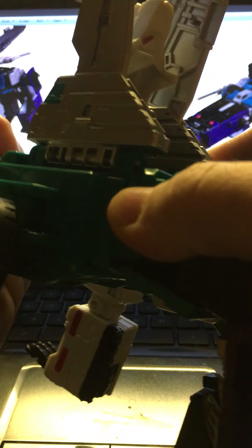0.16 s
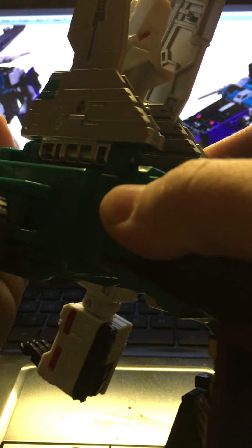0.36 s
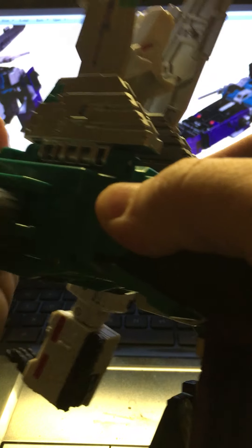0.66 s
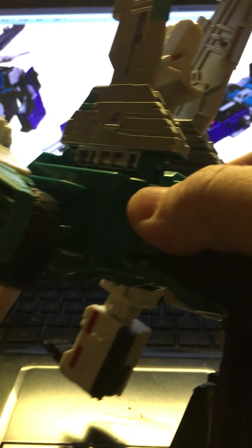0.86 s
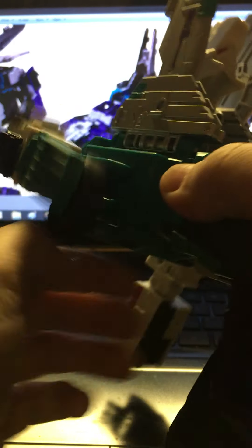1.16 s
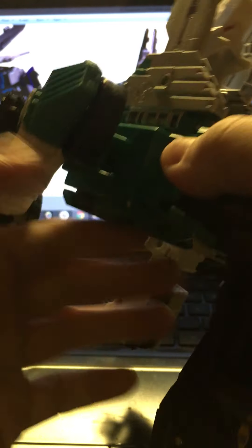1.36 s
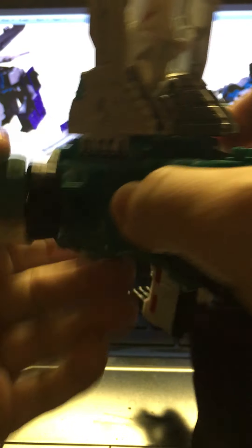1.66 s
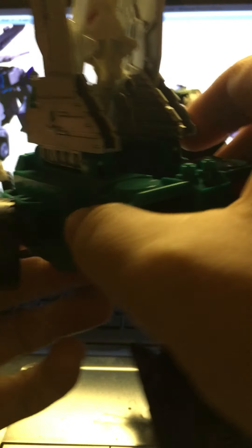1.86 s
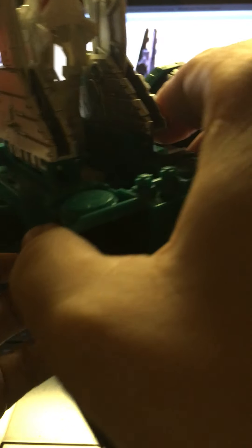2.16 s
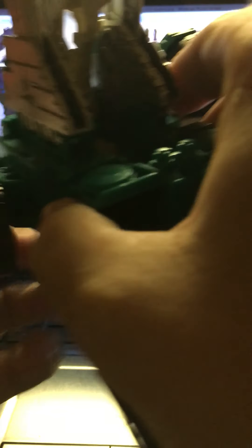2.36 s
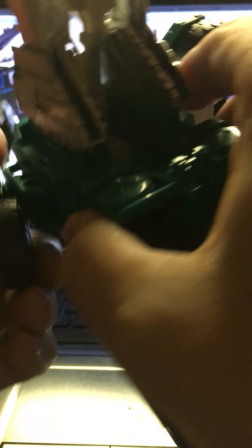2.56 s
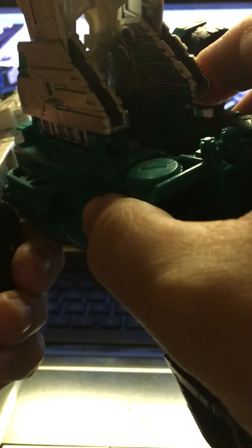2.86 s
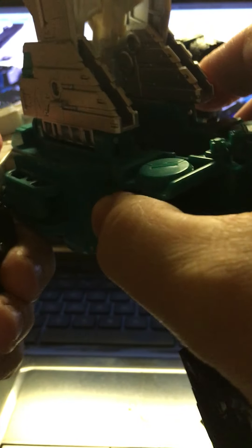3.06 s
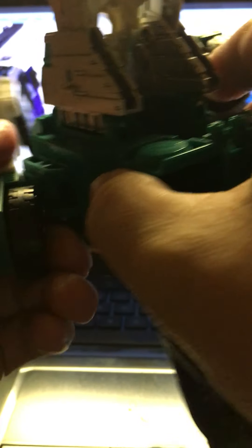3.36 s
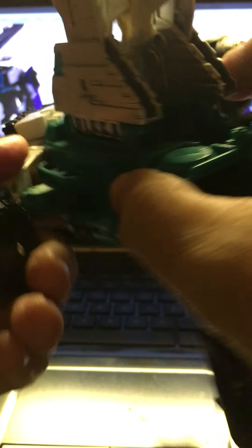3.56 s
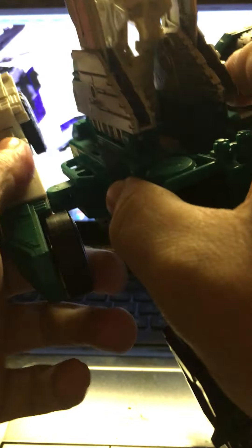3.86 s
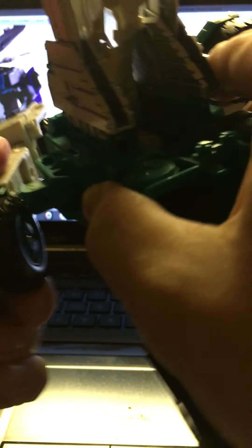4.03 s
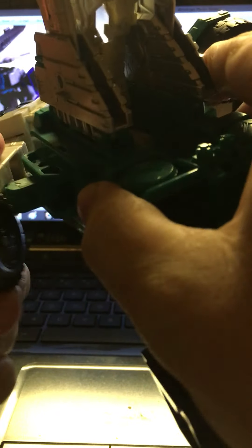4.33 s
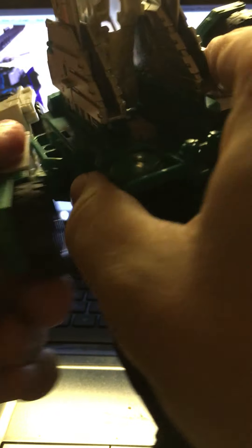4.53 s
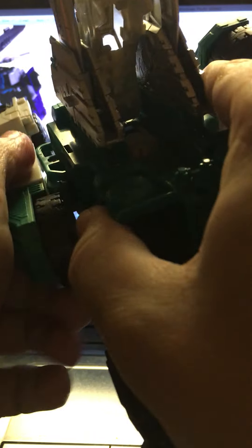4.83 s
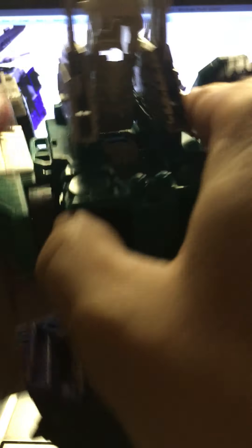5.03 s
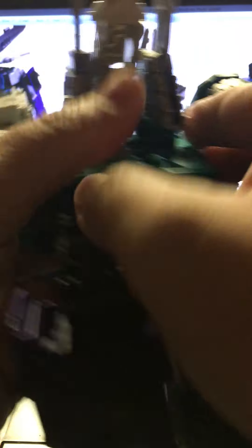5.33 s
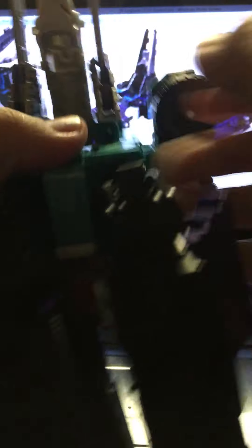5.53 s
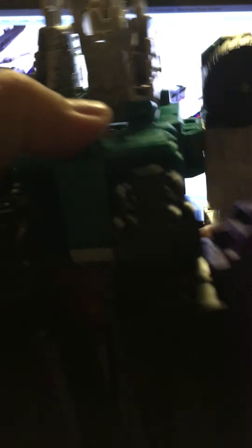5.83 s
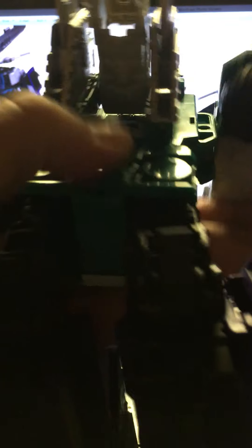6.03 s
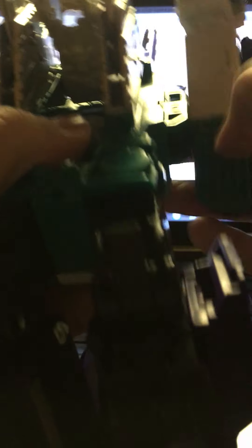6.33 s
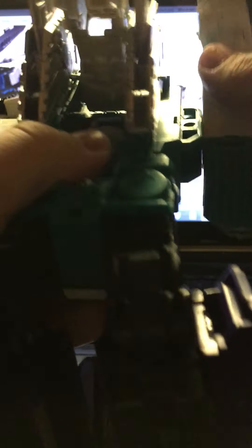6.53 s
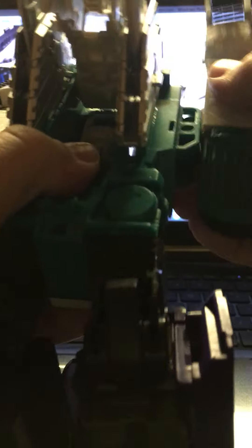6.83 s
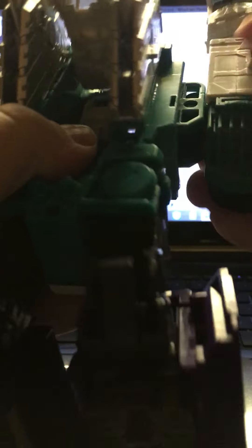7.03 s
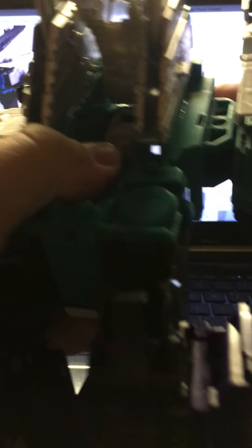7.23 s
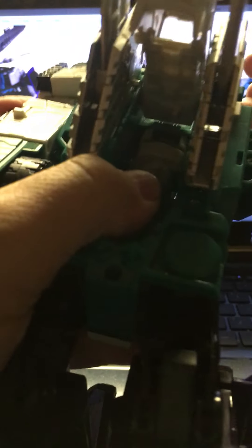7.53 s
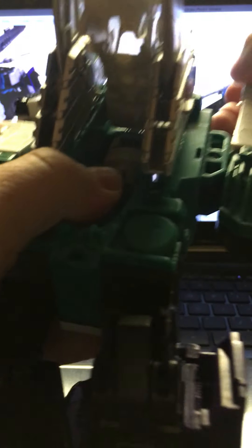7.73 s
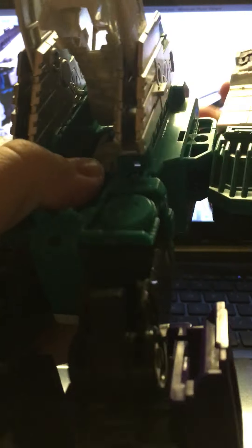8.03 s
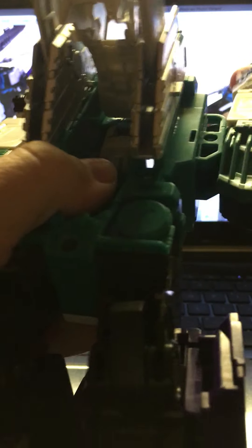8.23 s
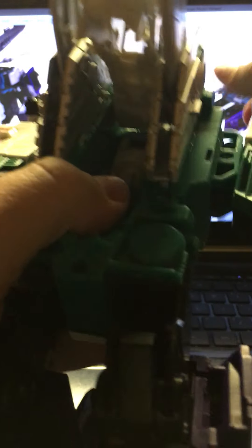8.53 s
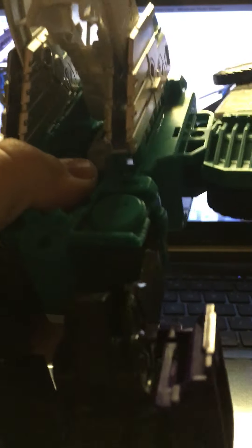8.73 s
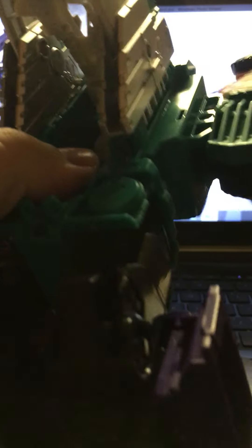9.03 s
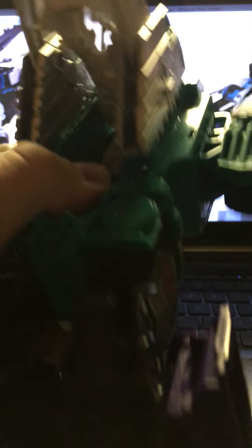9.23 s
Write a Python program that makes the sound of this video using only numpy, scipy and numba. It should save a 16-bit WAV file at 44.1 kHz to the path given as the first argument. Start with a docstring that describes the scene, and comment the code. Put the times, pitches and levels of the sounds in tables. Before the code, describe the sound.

Close, dry sounds of a hollow hard-plastic toy worked by hand at a desk, over a faint wavering computer fan hum. A quick flurry of small ticks opens, then sparse clicks until 0.9 s. From 1.24 to 1.9 s brighter clacks come in a cluster. Light scrapes and small ticks follow from 2.1 to 3.5 s. At 3.54 s a loud snap cracks, with a crisp rattling tail and a soft desk thud. Quieter clicks lead to more hard snaps at 4.52, 4.8 and 5.0 s. Around 5.65 to 5.95 s plastic rubs with faint breathy squeaks. From 6.0 to 7.1 s clicks crowd into dense ratcheting and chatter, with a thin loose piece tinkling until about 7.4 s. Moderate clicks continue at 7.6 to 8.8 s, with a faint squeak near 8.1. A short clatter at 9.1 to 9.3 s ends it.

```python
"""Snaps, knocks and rattles of a hollow hard-plastic toy, its joints turned by hands close to a phone on a
desk. Blows ring decaying shell modes; a thin loose piece tinkles on longer modes; random ticks and friction
noise make the rattle and rub, resonant noise the squeaks and a late ringing of the loose piece. Jolts thud in
the desk, a short noise tail is the small quiet room, and a computer fan hums underneath as wavering tones in
shaped noise."""
import sys
import numpy as np
from scipy import signal
from scipy.fft import rfft, irfft
from scipy.io import wavfile
from scipy.ndimage import uniform_filter1d
from numba import njit

SR = 44100
rng = np.random.default_rng(int(sys.argv[2]) if len(sys.argv) > 2 else 0)


def wrap_up_sound(samples):
    """Save the sound to the file named by the first command line argument, as 16-bit audio."""
    columns = np.atleast_2d(samples).T
    # keep every value between -1 and 1, then stretch to whole-number steps
    tamed = np.clip(columns, -1, 1)
    steps = np.round(tamed * 32767).astype(np.int16)
    wavfile.write(sys.argv[1], SR, steps)


N = 414083

# knocks and snaps: (time [s], size [dB], treble against body [dB], strongest ring [Hz])
KNOCK_EVENTS = [(0.019, -29, -2, 3150), (0.031, -28.5, 7.5, 6400), (0.052, -41, -8.5, 6560),
                (0.069, -31, 2.5, 4930), (0.081, -27, -10.5, 6600), (0.106, -33.5, -2, 3200),
                (0.1515, -32, -21, 1603), (0.176, -52, -5, 6600), (0.319, -28, -35, 1537),
                (0.563, -44, -5, 1940), (0.5689, -30, -12, 1930), (0.5873, -27, -6.5, 1508),
                (0.625, -39, -22.5, 1520), (0.641, -40.5, 5, 6550), (0.6884, -18, 0.5, 1420),
                (0.7092, -28.5, -41.5, 1585), (0.7903, -38, -11.5, 1536), (0.8474, -24.5, -4, 1504),
                (1.2417, -16, -8, 2550), (1.2683, -25, 7, 5470), (1.289, -24.5, -13, 1710),
                (1.3044, -18, -12, 1865), (1.3147, -14, -5, 2425), (1.336, -26, -9, 2230),
                (1.3913, -31, 5, 7500), (1.456, -37.5, -5, 1700), (1.4868, -31, -6.5, 1570),
                (1.505, -31, -7, 1550), (1.5389, -13, -3, 1510), (1.5809, -22, -1, 6500),
                (1.6083, -35, -9.5, 1816), (1.69, -34.5, 4.5, 6470), (1.721, -27.5, -8.5, 1576),
                (1.746, -18, -6.5, 3470), (1.8067, -25.5, -3.5, 3480), (1.8618, -33.5, -3, 1710),
                (2.1898, -36, -9.5, 1600), (2.3073, -32, -22.5, 1580), (2.562, -26.5, -6.5, 3600),
                (2.5926, -30, -17, 2250), (2.686, -39.5, 17, 7040), (2.748, -37.5, -20, 1504),
                 (2.7797, -38, -30.5, 1465), (2.8148, -34, -20.5, 1770), (2.867, -48, 15.5, 7500),
                (2.88, -28, -10.5, 1600), (2.93, -33, -12, 1712), (2.937, -38.5, -0.5, 2550),
                (2.987, -43.5, -12, 2450), (3.147, -26, -17, 3060), (3.287, -33, -11, 2680),
                (3.309, -36, 3, 5620), (3.318, -28, -6.5, 7420), (3.3415, -35, -2.5, 5740),
                (3.3692, -27.5, -37.5, 1410), (3.3873, -26.5, 3.5, 5780), (3.4276, -41, -20.5, 1786),
                (3.4805, -25, -5.5, 4440), (3.4855, -28, -5, 1770), (3.506, -35, -2, 1676),
                (3.5366, -22.5, -30.5, 1560), (3.5445, -3.5, -8.5, 1530), (3.558, -12, 1.5, 5790),
                (3.572, -13, 15, 5700), (3.588, -20, 18.5, 9760), (3.6188, -21.5, 23, 6400),
                (3.6271, -21.5, 9.5, 9700), (3.645, -29, 11.5, 6370), (3.6897, -26.5, -2, 1950),
                (3.728, -32.5, 4, 5650), (3.781, -30.5, -28, 1890), (3.8248, -34.5, -18.5, 2390),
                (3.858, -35.5, -5, 3720), (3.8842, -33.5, -5, 2520), (3.987, -34.5, -34, 2450),
                (4.0251, -26, -22.5, 2540), (4.084, -39.5, 4, 6040), (4.15, -35.5, -10.5, 3030),
                (4.216, -23, -2.5, 2350), (4.5195, -6, -7.5, 1846), (4.5299, -6.5, 12.5, 2530),
                (4.561, -34, 1.5, 2210), (4.7385, -37, -14, 1630), (4.7935, -13, -21, 2350),
                (4.803, -9, 7.5, 1895), (4.837, -18.5, 8, 5370), (4.971, -18.5, -19, 2440),
                (4.9875, -17.5, -4, 2420), (5.0, -4, 2.5, 2400), (5.065, -30, 27, 6380),
                (5.171, -34, -6, 2430), (5.3768, -20.5, -9.5, 2554), (5.642, -31, -21, 6270),
                (5.9697, -21.5, 6.5, 5680), (6.0054, -26, -5.5, 1650), (6.0258, -23.5, -12.5, 2550),
                (6.0932, -42, -14, 2900), (6.106, -14.5, -11.5, 2665), (6.203, -24, -0.5, 6300),
                (6.216, -41, -17, 2040), (6.2353, -20, -9.5, 2220), (6.262, -28, -30, 2240),
                (6.2735, -28, -28.5, 2380), (6.3148, -23.5, 4.5, 5470), (6.34, -26, -9, 2020),
                (6.355, -21, 5.5, 5190), (6.3699, -13, 0, 1900), (6.407, -28, 4.5, 6500),
                (6.4637, -28, -44, 3460), (6.5238, -25, -12, 3390), (6.5574, -28, -3.5, 3440),
                (6.596, -33, -42.5, 2460), (6.6203, -22.5, -16.5, 2310), (6.628, -25.5, 13, 2645),
                (6.6698, -19, -3.5, 6310), (6.7471, -25.5, 2.5, 8800), (6.7828, -31, -24.5, 3130),
                (6.812, -24.5, -6.5, 1653), (6.9407, -27.5, 4.5, 4560), (6.9807, -30, -1, 8650),
                (7.021, -21.5, 14, 7700), (7.0474, -23, 9, 7000), (7.1298, -22, -8.5, 3100),
                (7.204, -32, 1.5, 8650), (7.373, -39.5, -2.5, 6240), (7.5236, -33, -19, 3200),
                (7.538, -33.5, -5, 3760), (7.56, -28.5, -1.5, 4620), (7.605, -26.5, 7.5, 4600),
                (7.643, -17.5, 2, 2290), (7.6742, -24, -7, 1390), (7.6917, -14, 8, 7070),
                (7.715, -45, -1.5, 3300), (7.888, -35.5, -12, 2550), (8.052, -31, 0.5, 2060),
                (8.057, -24.5, -11.5, 3050), (8.0729, -23.5, -15.5, 2890), (8.109, -33, -0.5, 5240),
                (8.199, -28, -0.5, 1603), (8.2535, -29.5, -2, 1850), (8.2897, -30, 0.5, 4530),
                (8.2965, -19, -9, 2150), (8.313, -36, -20.5, 2870), (8.3298, -22.5, -28, 2140),
                (8.501, -34.5, -28, 2940), (8.5277, -37, -40, 1370), (8.6431, -25, -5.5, 6560),
                (8.6597, -17, -14, 2990), (8.772, -38, -1, 2960), (9.0914, -29.5, -16.5, 1664),
                 (9.118, -31, -23.5, 3000), (9.126, -18.5, -9, 2620), (9.1483, -14, -3, 2697),
                (9.254, -23, -15, 3310), (9.303, -15.5, -12.5, 1880)]
# nominal modes of the shell: (frequency [Hz], relative level [dB], t60 [s])
SHELL_MODES = [(750, -8.5, 0.029), (1174, 0, 0.025), (1388, 0.5, 0.032), (1548, -0.5, 0.044),
               (1709, 3.5, 0.036), (1971, 6, 0.021), (2215, -4, 0.049), (2455, 1, 0.033),
               (2840, 5.5, 0.013), (3135, 4.5, 0.016), (3534, 1, 0.028), (4023, 6.5, 0.0082),
               (4594, -3.5, 0.027), (5250, -2, 0.02), (5730, 5, 0.0085), (6410, -0.5, 0.022),
               (7235, 0, 0.0096), (8130, -9.5, 0.029), (8840, -2, 0.0084), (9710, -7, 0.016),
               (11340, -6, 0.0087), (12400, -9.5, 0.018), (14400, -10.5, 0.005), (15200, -10, .005)]
SHELL_HZ = np.array(SHELL_MODES)[:, 0]


def undb(db):
    """Gain of a level in dB."""
    return 10 ** (np.asarray(db) / 20)


def level(x, rms_db):
    """Scale to an rms level."""
    return x * undb(rms_db) / np.sqrt(np.mean(x ** 2))


def walk(rate_hz):
    """Random values 1 / rate_hz apart, joined by straight slews; rms near 1.7."""
    hold = int(SR / rate_hz)
    steps = np.repeat(rng.standard_normal(N // hold + 1), hold)
    return 2.07 * uniform_filter1d(steps, hold)[:N]


@njit
def rings(start, gain, hz, t60_s, length):
    """Every blow starts a decaying sine in each mode."""
    out = np.zeros(length)
    for e in range(len(start)):
        for m in range(gain.shape[1]):
            # one complex multiply per sample turns and shrinks the mode
            p = np.exp(2j * np.pi * hz[e, m] / SR - np.log(1000) / (t60_s[e, m] * SR))
            z = gain[e, m] + 0j
            for i in range(start[e], min(length, start[e] + int(t60_s[e, m] * SR * .8))):
                out[i] += z.imag
                z *= p
    return out


def strike(modes, s, size_db, colour_db, scatter_db, detune, ring=1, bend=1):
    """Blows at times s; each draws anew its drive, sign, pitch and decay in every mode."""
    hz, mode_db, t60_s = np.transpose(modes)
    chance = rng.standard_normal((len(s), 4, len(hz)))
    gain = undb(mode_db + colour_db + scatter_db * chance[:, 0]) * np.sign(chance[:, 1])
    # size is the root-sum-square over the modes
    gain *= (undb(size_db) / np.sqrt(np.sum(gain ** 2, axis=1)))[:, None]
    pitch_hz = np.minimum(bend * hz * (1 + detune * chance[:, 2]), .45 * SR)
    decay_s = ring * t60_s * np.exp(0.26 * chance[:, 3])
    start = (np.asarray(s) * SR).astype(np.int64)
    return rings(start, gain, pitch_hz, decay_s, N)


def resonate(push, hz, t60_s):
    """One mode driven by a continuous force."""
    r = 1000 ** (-1 / (t60_s * SR))
    turn = 2 * np.pi * hz / SR
    return signal.lfilter([np.sin(turn)], [1, -2 * r * np.cos(turn), r * r], push)


def knocks():
    """Each knock rings the shell: one firm contact and two lighter within 1 ms, then three weaker bounces."""
    s, size_db, _, ring_hz = np.transpose(KNOCK_EVENTS)
    # the grip pulls the nearest mode onto the knock's own pitch
    off = np.log(ring_hz[:, None] / SHELL_HZ)
    nearest = np.abs(off) == np.abs(off).min(axis=1, keepdims=True)
    bend = np.exp(off * nearest)
    out = 0
    for lighter_db in (4.5, 10.5, 10.5):
        contact_s = s + rng.uniform(0, .001, len(s))
        out += strike(SHELL_MODES, contact_s, size_db - lighter_db, knock_colours(),
                      scatter_db=0.0, detune=0.014, ring=0.79, bend=bend)
    for _ in range(3):
        wait_s = rng.exponential(.004, len(s))
        # later bounces are weaker, by 500 dB/s
        out += strike(SHELL_MODES, s + wait_s, size_db - 7.0 - 500 * wait_s, knock_colours(),
                      scatter_db=5.5, detune=0.033, bend=bend)
    return out


def knock_colours():
    """dB per knock and shell mode: hardness, favour near its pitch and overtone, less below its pitch."""
    _, _, treble_db, ring_hz = np.transpose(KNOCK_EVENTS)

    def near(hz):
        """Bell around hz on a log-frequency axis."""
        return np.exp(-(np.log(SHELL_HZ / hz[:, None]) / 0.048) ** 2)

    below = np.clip(np.log2(np.minimum(ring_hz, 2500)[:, None] / SHELL_HZ), 0, 1)
    favour_db = 10.0 * near(ring_hz) + 3.6 * near(1.93 * ring_hz)
    return -5.0 * below + hardness(0.79 * (treble_db + 11.5)) + favour_db


def hardness(treble_db):
    """Harder contacts reach the upper modes: a ramp across 2.5-8.6 kHz."""
    ramp = np.clip(np.log2(SHELL_HZ / 2500) / 1.79, 0, 1)
    return np.outer(treble_db, ramp)


def loose_piece():
    """A thin part that rings longer on nearly fixed pitches; each tap is a quick double touch."""
    # taps: (time [s], size before the split into two touches [dB])
    tap_events = [(6.981, -38), (7.0209, -36), (7.0484, -35), (7.0853, -39), (7.1596, -39), (7.204, -42),
                  (7.2124, -37), (7.2215, -64), (7.2409, -42.5), (7.3043, -46.5), (7.3154, -58),
                  (7.332, -52), (7.345, -50), (7.3537, -56), (7.394, -42), (7.403, -44.5), (7.413, -61),
                  (8.072, -44)]
    # nominal modes: (frequency [Hz], relative level [dB], t60 [s])
    piece_modes = [(1400, -8, .06), (2040, -5, .07), (3710, -6, .07), (4500, -1, .015), (5660, -2, .024),
                   (6550, -6, .05), (7270, -5, .05), (8600, -1, .035)]
    # the piece chatters while the joint is forced
    chatter_start_s, chatter_end_s, chatter_per_s, chatter_top_db = 6.2, 6.97, 60, -41
    span_s = chatter_end_s - chatter_start_s
    chatter = rng.uniform(0, 1, (int(chatter_per_s * span_s), 2)).T
    s, size_db = np.transpose(tap_events)
    s = np.append(s, chatter_start_s + span_s * chatter[0])
    size_db = np.append(size_db, chatter_top_db - 10 * chatter[1])
    return sum(strike(piece_modes, s + wait_s, size_db - 3, 0, scatter_db=3, detune=.008)
               for wait_s in (0, .0017))


def rattle(rumble_db=-16.5):
    """Ticks and rub follow the handling and the knocks, with a dull rumble in the hands."""
    # how hard the hands work the toy: (time [s], level [dB])
    handling_curve = [(0.0, -48), (0.14, -69), (0.85, -72.5), (0.92, -82), (1.23, -72.5), (1.5, -61),
                      (1.82, -55), (1.95, -70.5), (2.09, -53.5), (2.22, -62.5), (2.3, -79), (2.5, -63.5),
                      (3.27, -69), (3.4, -55), (4.24, -57.5), (4.311, -74), (4.7, -63), (5.2, -61.5),
                      (5.68, -51), (5.77, -62.5), (6.02, -47), (6.19, -58.5), (6.39, -41.5), (6.68, -45.5),
                      (6.74, -52.5), (7.4, -66.5), (7.44, -76), (8.001, -60), (8.539, -62), (8.579, -70.5),
                      (8.72, -58), (9.041, -71.5), (9.148, -41.5), (9.21, -74), (9.39, -84)]
    handling_db = np.interp(np.arange(N) / SR, *np.transpose(handling_curve))
    grip = np.sqrt(undb(handling_db) ** 2 + shaking())
    band = signal.butter(2, [170, 340], "bandpass", fs=SR, output="sos")
    rumble = level(signal.sosfilt(band, rng.standard_normal(N)), rumble_db)
    rumble *= uniform_filter1d(np.minimum(grip, undb(-44.5)), size=3000)
    shell = level(ticks(), 0) + level(rub(), -4.0)
    return shell * grip + rumble


def shaking():
    """Power of the rattle of loose parts that every knock sets off and that then dies away."""
    # the rattle grows 1.3 dB per dB of knock size
    offset_db, growth, rise_s, fade_db_per_s = -21.5, 1.3, 0.0009, 253
    s, size_db = np.transpose(KNOCK_EVENTS)[:2]
    kicks = np.zeros(N)
    np.add.at(kicks, (s * SR).astype(int), undb(offset_db + growth * size_db) ** 2)
    t = np.arange(SR // 2) / SR
    response = (1 - np.exp(-t / rise_s)) * undb(-fade_db_per_s * t) ** 2
    # FFT rounding may dip below zero
    return np.maximum(signal.oaconvolve(kicks, response)[:N], 0)


def ticks(per_s=340, spread_db=3.5):
    """Random small blows of uneven size; they keep part of the colour of the part knocked last."""
    s = np.sort(rng.uniform(0, N / SR, int(per_s * N / SR)))
    size_db = spread_db * np.minimum(rng.exponential(1, len(s)), 2.8)
    last = np.maximum(np.searchsorted(np.array(KNOCK_EVENTS)[:, 0], s) - 1, 0)
    return strike(SHELL_MODES, s, size_db, 0.54 * knock_colours()[last], scatter_db=8.5, detune=0.029)


def rub():
    """Friction noise in every shell mode; as the contact creeps, each mode swells and fades alone."""
    push = rng.standard_normal(N) * undb(3.0 * walk(60))
    out = np.zeros(N)
    for k, (hz, mode_db, t60_s) in enumerate(SHELL_MODES):
        swell = undb(mode_db + 2.07 * walk(8))
        out += (-1) ** k * swell * resonate(push, hz, 0.24 * t60_s)
    return out


def squeaks():
    """Breathy whistles of plastic sliding on plastic, and a late ringing of the loose piece: noise drives one
    resonance per event."""
    # slow slides: (start [s], end [s], resonance [Hz], level before the fade [dB]); the last row is the loose
    # piece ringing near 2.1 kHz
    slide_events = [(5.661, 5.699, 3240, -47.5), (5.714, 5.91, 3770, -65), (5.887, 5.958, 2300, -52),
                    (8.092, 8.22, 2100, -60)]
    out = np.zeros(N)
    for start_s, end_s, hz, rms_db in slide_events:
        a, b = int(start_s * SR), int(end_s * SR)
        whistle = level(resonate(rng.standard_normal(b - a), hz, 0.038), rms_db)
        out[a:b] += whistle * np.sqrt(np.hanning(b - a))
    return out


def desk():
    """Jolts shake desk and phone: soft, low thuds from decaying low modes."""
    # jolts that reach the desk: (time [s], size before filtering [dB])
    jolt_events = [(3.548, -28), (4.526, -32.5), (4.79, -44), (4.98, -37.5), (9.142, -42)]
    # nominal modes of desk and phone: (frequency [Hz], relative level [dB], t60 [s])
    desk_modes = [(60, 0, .1), (100, -3, .08), (193, -9, .05), (310, -10, .04), (502, -10, .03)]
    s, size_db = np.transpose(jolt_events)
    thud = strike(desk_modes, s, size_db, 0, scatter_db=5.5, detune=0.058)
    thud = uniform_filter1d(thud, size=40)  # softens the onset
    return signal.sosfilt(signal.butter(2, 40, "highpass", fs=SR, output="sos"), thud)


def room(toy, tail_db=-26, t60_s=.2):
    """A short diffuse tail of decaying noise, starting 3 ms after the direct sound."""
    t = np.arange(int(.4 * SR)) / SR
    tail = rng.standard_normal(len(t)) * 1000 ** (-t / t60_s) * (t > .003)
    tail /= np.sqrt(np.sum(tail ** 2))
    return undb(tail_db) * signal.oaconvolve(toy, tail)[:N]


def fan(air_db=-65.5):
    """Wavering motor and blade tones over a soft rush of air."""
    # motor and blade tones: (frequency [Hz], nominal rms level [dB])
    tone_table = [(59.2, -60), (354.5, -74), (387.6, -82), (581.4, -74.5), (775.2, -79), (920.5, -74)]
    # spectrum of the air rush: (frequency [Hz], relative level per Hz [dB])
    air_spectrum = [(30, -37.5), (60, 5), (110, -3.5), (250, -7), (500, -13), (1000, -11.5), (2500, -32.5),
                    (6000, -35.5), (16000, -32.5)]
    t = np.arange(N) / SR
    tones = np.zeros(N)
    for hz, rms_db in tone_table:
        amplitude = np.sqrt(2) * undb(rms_db + 0.8 * walk(3))
        wander_rad = 0.4 * walk(2.7) + 0.6 * np.minimum(hz / 300, 1) * walk(30)
        tones += amplitude * np.sin(2 * np.pi * hz * t + wander_rad)
    bin_hz = np.maximum(np.fft.rfftfreq(N, 1 / SR), 1)
    point_hz, point_db = np.transpose(air_spectrum)
    shape = undb(np.interp(np.log(bin_hz), np.log(point_hz), point_db))
    air = irfft(rfft(rng.standard_normal(N)) * shape, N)
    return tones + level(air, air_db)


def scene():
    """Toy, desk, room and fan at one microphone."""
    struck = knocks() + loose_piece()
    # small parts radiate the bass poorly
    struck = signal.sosfilt(signal.butter(2, 750, "highpass", fs=SR, output="sos"), struck)
    toy = struck + rattle() + squeaks()
    return (toy + desk() + room(toy) + fan())[None, :]


def record(dry):
    """The phone cuts the top above 16 kHz."""
    return signal.sosfilt(signal.ellip(8, .2, 70, 16000, fs=SR, output="sos"), dry)


dry = scene()
out = record(dry)
wrap_up_sound(out)
```